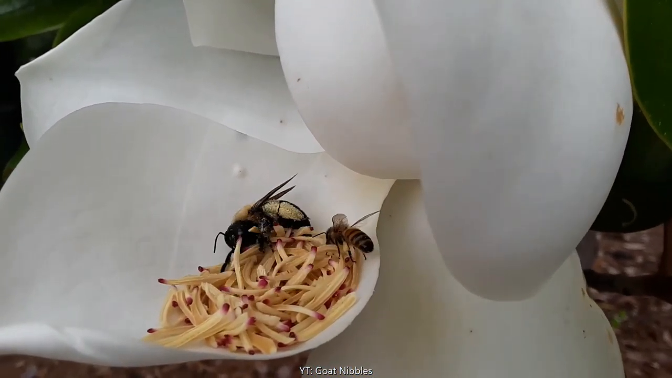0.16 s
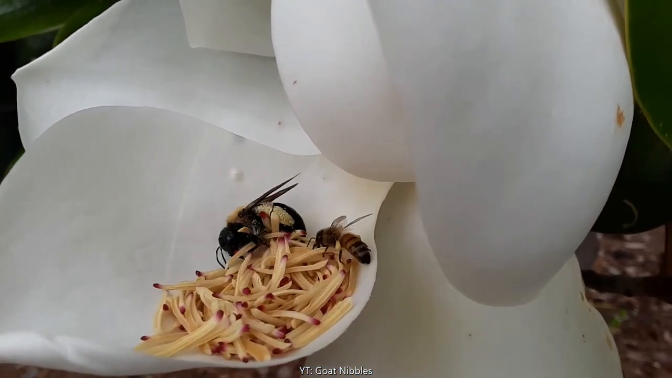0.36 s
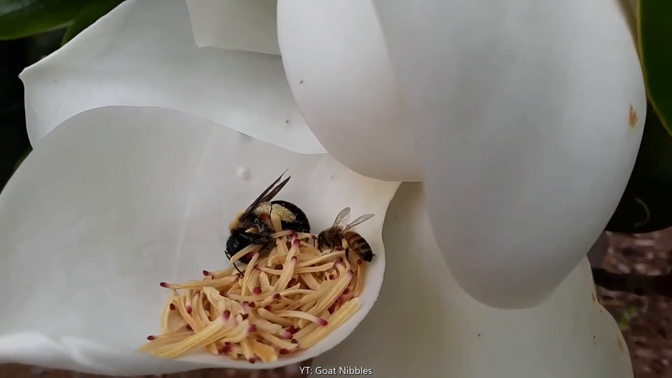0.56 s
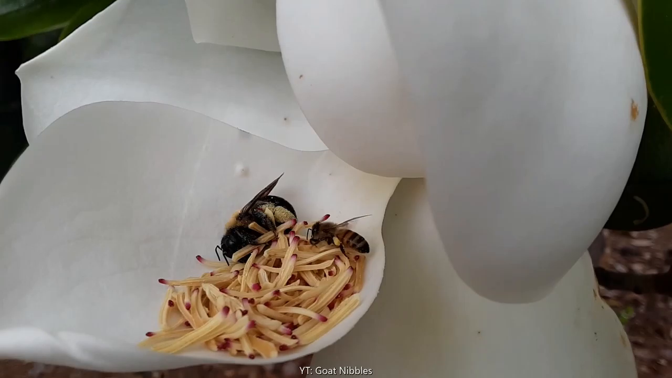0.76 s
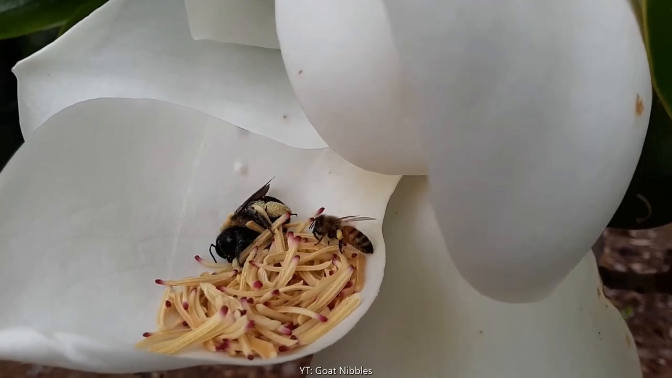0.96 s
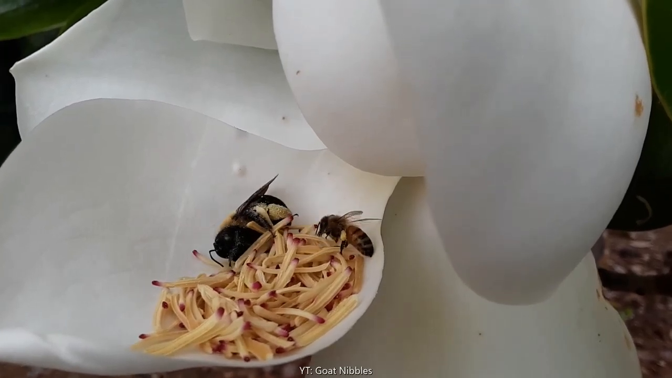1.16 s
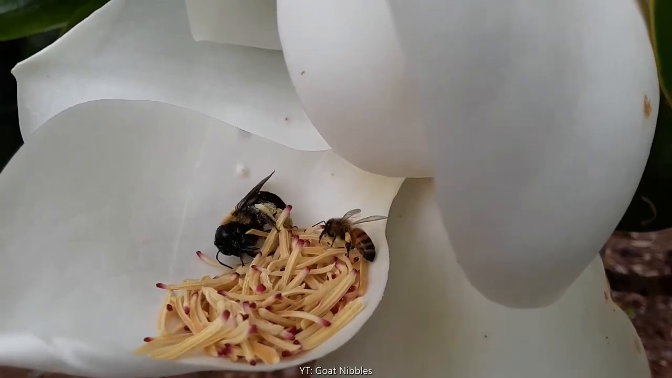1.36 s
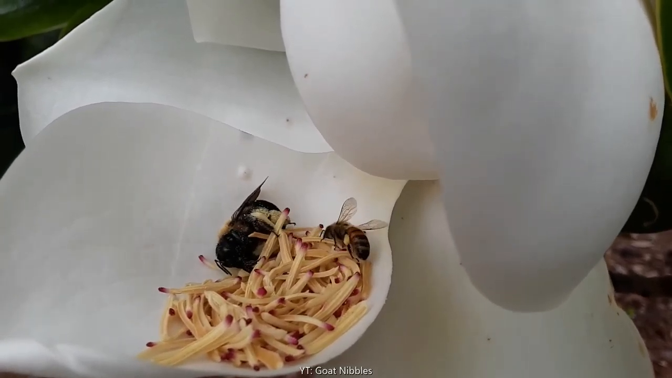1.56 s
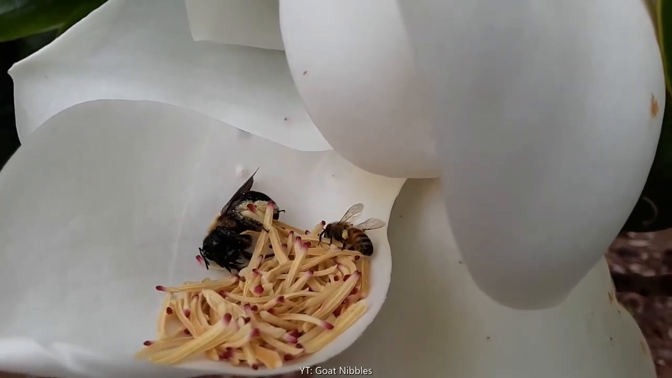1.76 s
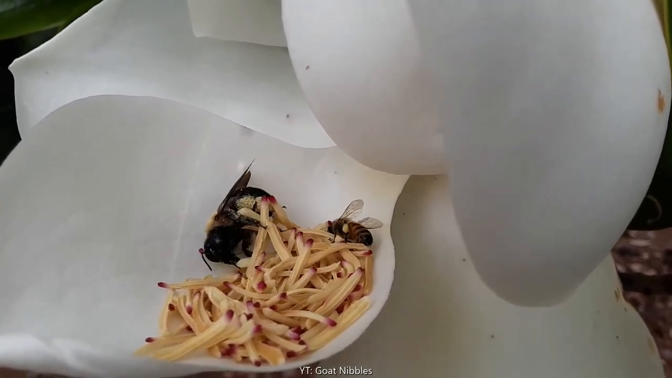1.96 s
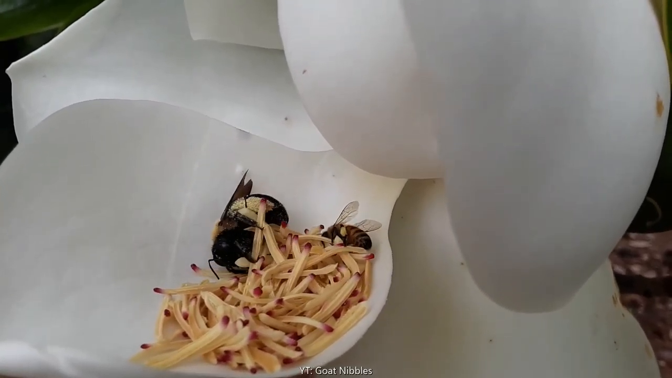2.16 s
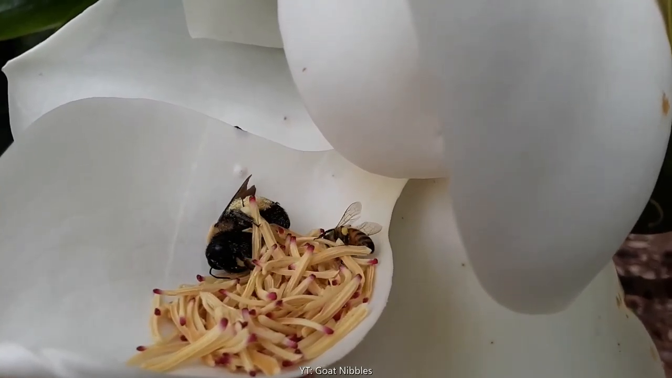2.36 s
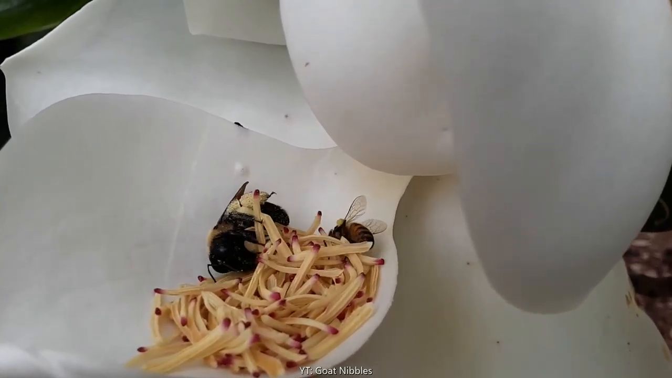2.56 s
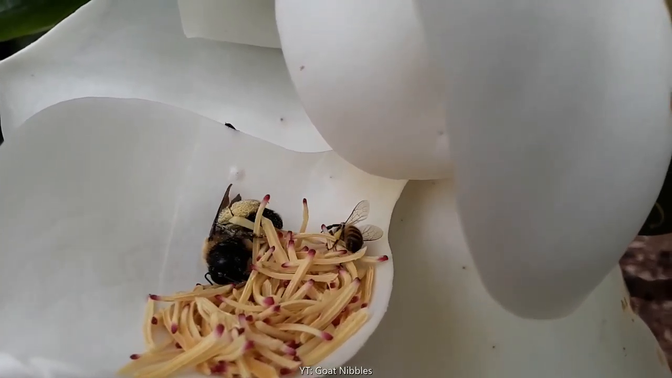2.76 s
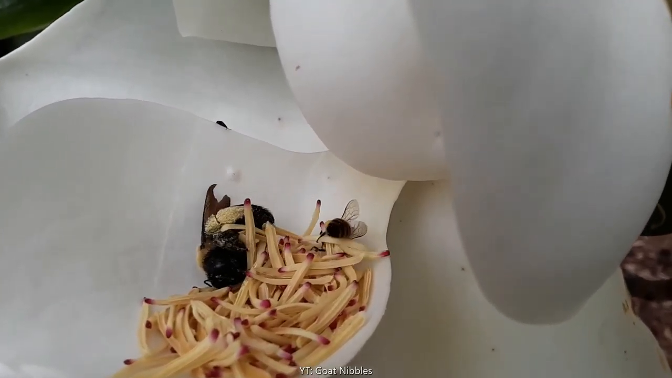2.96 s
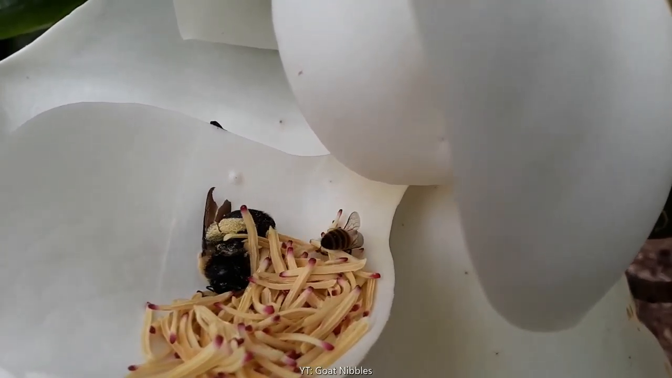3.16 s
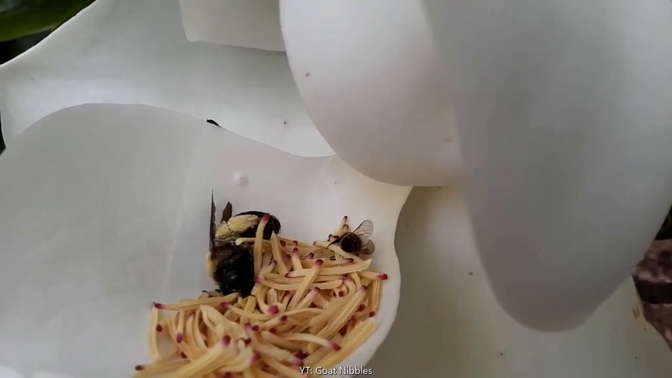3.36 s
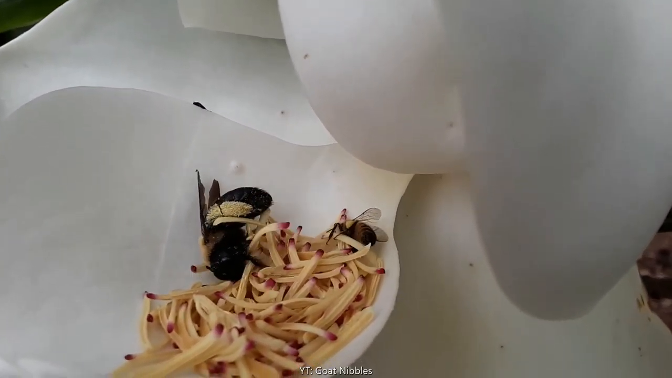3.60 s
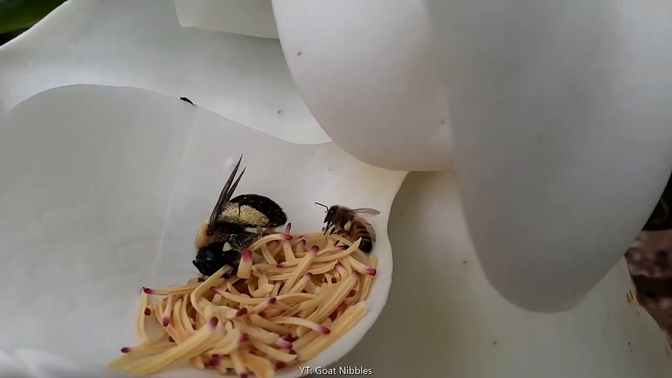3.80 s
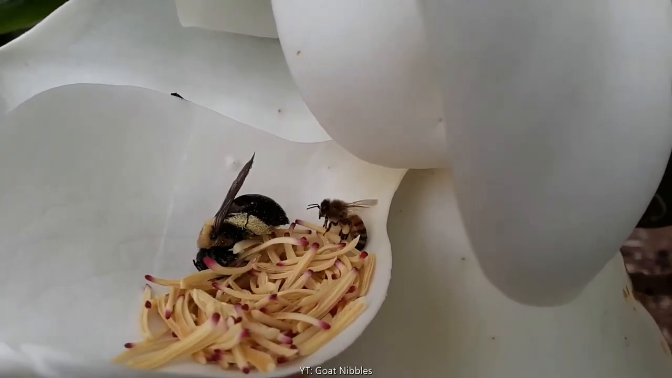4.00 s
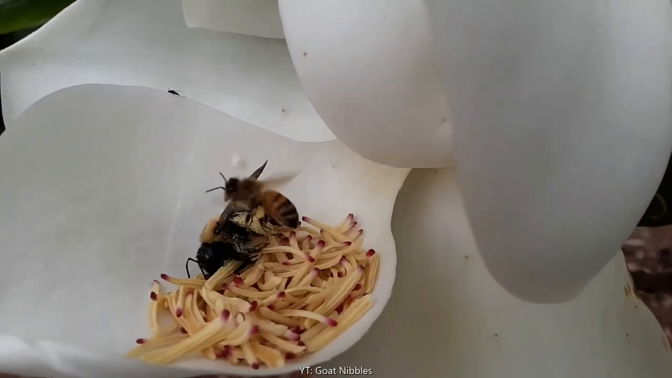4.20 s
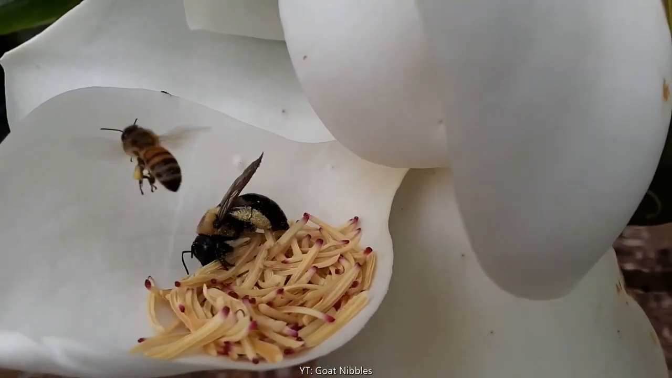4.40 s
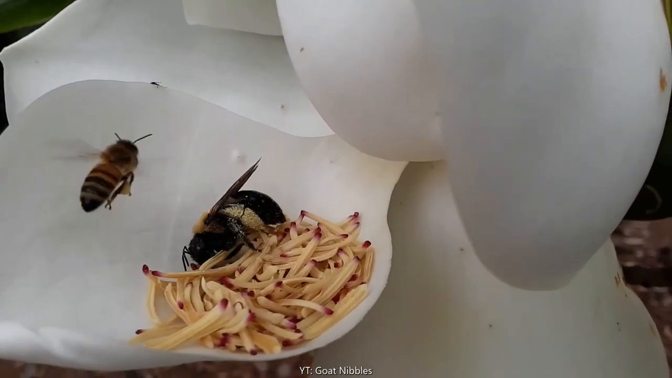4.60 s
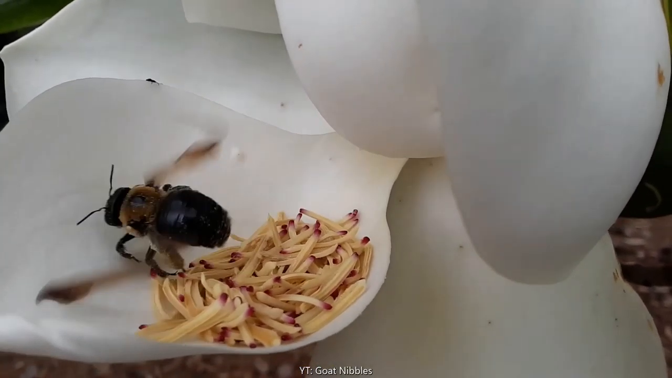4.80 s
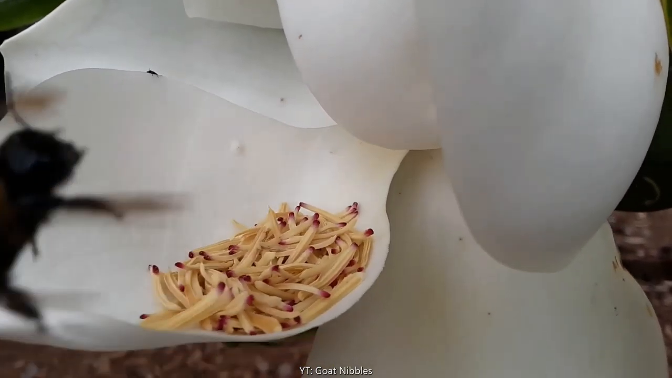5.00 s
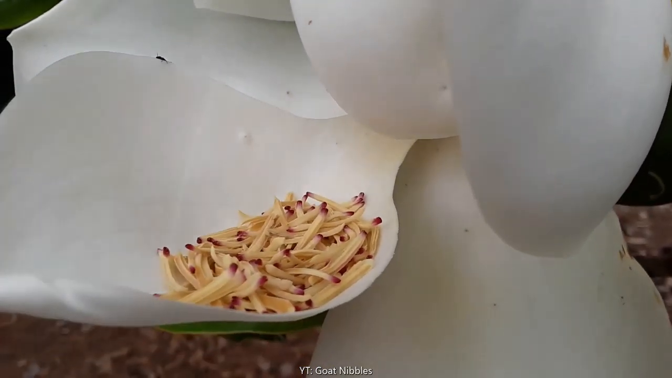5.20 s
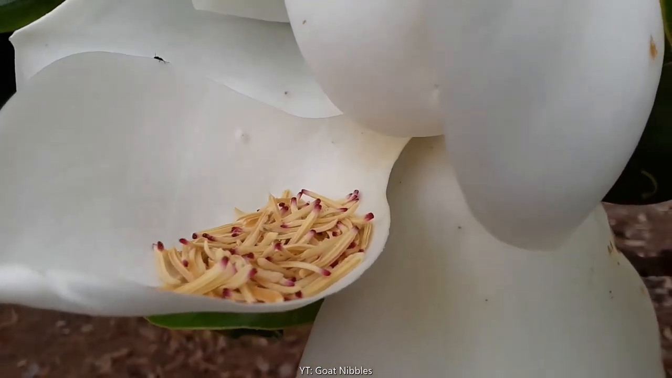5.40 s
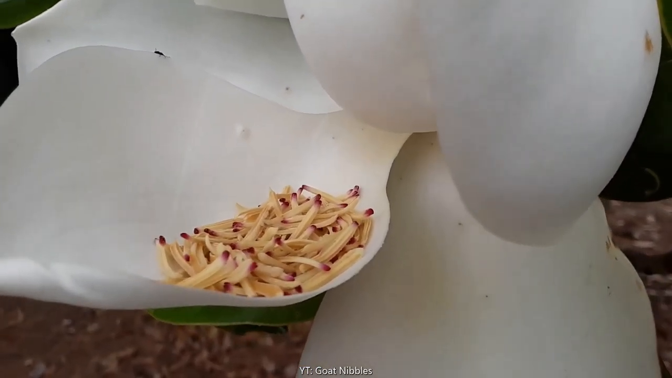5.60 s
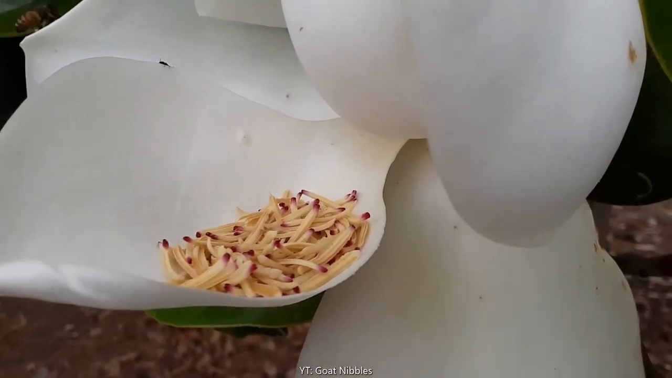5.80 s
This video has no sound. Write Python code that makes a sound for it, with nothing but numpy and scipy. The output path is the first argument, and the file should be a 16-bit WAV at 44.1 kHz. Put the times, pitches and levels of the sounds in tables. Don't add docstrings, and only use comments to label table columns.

```python
import sys
import numpy as np
from scipy import signal
from scipy.fft import rfft, irfft, next_fast_len
from scipy.io import wavfile
from scipy.ndimage import map_coordinates

SR = 44100
rng = np.random.default_rng(int(sys.argv[2]) if len(sys.argv) > 2 else 0)


def wav_out(sig):
    wavfile.write(sys.argv[1], SR, np.round(np.clip(np.atleast_2d(sig).T, -1, 1) * 32767).astype(np.int16))


def level_to_linear(level):
    exponent = np.asarray(level, float) / 20
    return 10 ** exponent


N = 257975

# t/s, f/Hz, level/dB
DIP = [(0, 5750, -20), (.012, 5950, -5), (.025, 6150, 4), (.036, 5100, -6), (.052, 4150, -12),
       (.072, 3080, -13), (.084, 4000, -17), (.094, 4950, -6), (.102, 5120, 0), (.122, 4930, -14)]
RISE = [(0, 3100, -22), (.05, 3250, -25), (.15, 4040, -8), (.2, 4440, -10.5), (.24, 5000, 2),
        (.28, 5444, 9.5), (.31, 5800, -38.5)]
WARBLE = [(0, 6900, -20), (.012, 6300, 1), (.03, 6600, 6), (.055, 6900, -3), (.11, 7200, -10),
          (.17, 7300, -8), (.19, 8400, -6)]
SLUR = [(0, 7150, -6), (.01, 6800, 6), (.025, 6200, 5), (.06, 6350, -2), (.11, 6300, -12)]
FALL = [(0, 4114, -11), (.02, 4320, -7), (.06, 3965, -2), (.095, 3400, -11.5), (.1, 3460, -42)]
UP = [(0, 4900, -12), (.008, 6000, 6), (.016, 6400, 2), (.022, 6450, -8)]
DOWN = [(0, 7050, -2), (.006, 6440, 5.5), (.018, 4900, -22)]
STEP = [(0, 4750, -6), (.012, 4850, 3), (.032, 4950, -3), (.042, 5450, 1), (.065, 5550, -4)]
LOW = [(0, 2444, -3), (.03, 2313, 3), (.09, 2050, -13), (.12, 2000, -12)]
HOOK = [(0, 2350, -14), (.03, 2900, -10), (.04, 2100, -22), (.06, 1990, -6), (.1, 2080, -1), (.13, 2220, 1),
        (.17, 2300, -7), (.24, 2250, -20)]
SEEP = [(0, 6900, 5), (.02, 7560, 2.9), (.06, 7680, 1.5), (.24, 7095, 0.5)]
FLICK = [(0, 6400, -6), (.018, 7720, 3.5), (.04, 8000, -14)]
CHIP = [(0, 5600, -28), (.005, 6300, -9), (.008, 6620, 0), (.012, 6660, -7), (.02, 6660, -18)]
FLAT = [(0, 978, 15), (.03, 1011, 2.1), (.1, 977, 8.1)]
DRONE = [(0, 1170, -6), (.18, 1150, 0), (.28, 1060, 2), (.42, 1165, -1), (.6, 1130, -4), (.9, 1150, -12),
         (1.1, 1135, -3), (1.4, 1140, -16), (1.65, 1120, -4), (1.9, 1150, -12)]
HOP = [(0, 4700, -8), (.008, 5100, 1), (.018, 5700, 3), (.04, 5450, -4), (.055, 5150, -8)]
HELD = [(0, 6650, -1), (.02, 6680, 0), (.04, 6650, -12), (.27, 6620, -22)]
PEEP = [(0, 4250, -8), (.012, 4300, 0), (.03, 4300, -8)]
GLIDE = [(0, 4000, -10), (.08, 4250, -1), (.14, 4600, 5), (.17, 4700, -3)]
MURMUR = [(0, 990, -4), (.15, 1005, 0), (.3, 995, -2), (.4, 1010, -6)]
TICK = [(0, 6800, -4), (.005, 6500, 0), (.012, 6050, -6)]


def unit(x):
    return x / np.sqrt(np.mean(x ** 2) + 1e-20)


def along(points, hz):
    f, v = np.transpose(points)
    return np.interp(np.log(hz + 1), np.log(f + 1), v)


def curves(rows, fade=0.013):
    s, *cols = np.transpose(rows)
    t = np.arange(N) / SR
    gate = np.clip(np.minimum(t - s[0], s[-1] - t) / fade + 1, 0, 1)
    return [gate] + [np.interp(t, s, c) for c in cols]


def ramp(start, length):
    return np.clip((np.arange(N) / SR - start) / length, 0, 1)


def wobble(rate, size=N):
    coarse = np.arange(0, size + 16, 16)
    knots = rng.standard_normal(int(size * rate / SR) + 4)
    return np.interp(np.arange(size), coarse, map_coordinates(knots, [coarse * rate / SR]))


def filtered(x, response):
    m = next_fast_len(N + 8192)
    return irfft(rfft(x, m) * response(np.fft.rfftfreq(m, 1 / SR)), m)[..., :N]


def noise(spectrum, channels=1):
    white = rng.standard_normal((channels, N))
    return unit(filtered(white, lambda hz: level_to_linear(along(spectrum, hz))))


def beside_left(pair, shade_db=0):
    # f/Hz, level/dB
    shadow = [(100, -2), (1500, -9), (6000, -9), (8000, -18), (11000, -37), (16000, -12)]
    off_petals = 0.033 * np.roll(pair[0], 18) + pair[1]
    far = filtered(off_petals, lambda hz: level_to_linear(along(shadow, hz)))
    return np.array([pair[0], far * level_to_linear(-shade_db)])


def hum(turns, orders, unsteady_db, ragged, overtones_db=0, upper_db=0):
    total = 0
    for k, db in orders:
        level_db = db + (k > 1) * overtones_db + (k > 4.5) * upper_db
        level_db = level_db + unsteady_db * np.log(k + .5) * wobble(20)
        fray = ragged * np.log(k + 0.17) * wobble(70)
        total = total + level_to_linear(level_db) * np.cos(2 * np.pi * (k * turns - 0.06854 * k * k) + fray)
    return total / np.sqrt(np.sum(level_to_linear(np.transpose(orders)[1]) ** 2) / 2)


def strokes(turns, share, life, scatter_db):
    puffs = level_to_linear(scatter_db * rng.standard_normal(int(turns.max()) + 2))
    size = puffs[np.clip(turns, 0, None).astype(int)]
    share = np.clip(share, 0, 1)
    return 1 - share + share * unit(size * np.exp(-(turns % 1) / life))


def wing(turns, spectrum, share, life, snap_db, scatter_db):
    snap = np.exp(-(turns % 1) / 0.0074) * level_to_linear(2.5 * wobble(60))
    snap = unit(filtered(snap, lambda hz: level_to_linear(along(spectrum, hz)) * np.exp(1.2j * np.sin(hz / 500))))
    puffs = strokes(turns, share, life, scatter_db) * noise(spectrum, channels=2)
    return unit(puffs + level_to_linear(snap_db) * snap)


def carpenter_bee():
    # t/s, closeness as hum level/dB
    closeness = [
        (4.83, -40.5),
        (4.93, -47.5),
        (4.955, -37.5),
        (5.055, -28),
        (5.092, -14),
        (5.185, -17),
        (5.25, -33.5),
        (5.39, -47.5),
        (5.85, -61),
    ]
    # t/s, f/Hz
    big_beat = [
        (4.83, 111.7),
        (4.94, 123.7),
        (5.05, 120.7),
        (5.29, 121.1),
        (5.39, 116.9),
        (5.46, 119.2),
        (5.66, 115.5),
        (5.85, 122.1),
    ]
    # multiple of the wingbeat, level/dB
    far_orders = [(1, -13), (2, 1), (3, -12.5), (4, -15), (5, -12.5), (6, -16.5), (7, -32), (8, -15),
                  (9, -12.5), (10, -33), (11, -22), (12, -50), (13, -42), (14, -23), (15, -24), (16, -20)]
    # multiple of the wingbeat, level/dB
    near_orders = [(1, -6), (2, -0.5), (3, -4), (4, -10.5), (5, -16), (6, -17.5), (7, -28.5), (8, -25.5)]
    # f/Hz, level/dB per Hz
    downwash = [(25, -25), (55, -23), (100, 1.5), (200, -4.5), (320, -2.5), (700, -18.5), (2000, -34),
                (4000, -74)]
    # t/s, level/dB, length/s
    gusts = [
        (5.099, 4, 0.016),
        (5.155, 6, 0.012),
        (5.183, 2, 0.0057),
    ]
    # f/Hz, level/dB per Hz
    big_wing = [(600, -18), (1050, -1.5), (1800, -9), (3300, -1.7), (6630, -2.5), (8470, -13.5),
                (13600, -6), (15800, -15)]
    clear_of_petal = 4.945

    gate, db = curves(closeness, fade=0.036)
    turns = np.cumsum(curves(big_beat)[1] * (1 + .004 * wobble(30))) / SR
    near = np.clip((db + 38.5) / 16, 0, 1)
    far_hum = hum(turns, far_orders, unsteady_db=.9, ragged=0.3 + 0.2 * np.clip((db + 55) / 12, 0, 1),
                  upper_db=-.4 * np.maximum(db + 56, 0))
    near_hum = hum(turns, near_orders, unsteady_db=0.0, ragged=0.36)
    tone = level_to_linear(db + 6.0) * ((1 - near) * far_hum + near * near_hum)

    t = np.arange(N) / SR
    gust_db = sum(peak_db * np.exp(-((t - s) / length) ** 2) for s, peak_db, length in gusts)
    push_off_db = 20 * (1 - ramp(clear_of_petal, 0.054))
    wash_db = gust_db + 3.5 + 1.34 * db + push_off_db
    puffs = strokes(turns, 0.15, 1.0, scatter_db=3)
    wash = level_to_linear(wash_db) * (0.36 + 0.85 * near) * puffs * noise(downwash)[0]

    glare_db = 4 * np.exp(-((t - 5.09) / 0.022) ** 2)
    rasp = wing(turns, big_wing, share=.5 - .25 * np.clip((db + 40) / 8, 0, 1), life=.13,
                snap_db=-1.5, scatter_db=2)
    rasp_db = -33.5 + 0.34 * db + glare_db
    hiss = ramp(clear_of_petal, 0.016) * level_to_linear(rasp_db) * rasp

    lead_db = 21 + .64 * np.maximum(db + 50, 0)
    body = tone * [np.ones(N), level_to_linear(-lead_db)] + wash * [[1], [0]]
    return gate * body + beside_left(hiss, shade_db=9.5 + 31 * near)


def honeybee():
    # t/s, wingbeat f/Hz, level of the second multiple/dB
    flight = [
        (4.1, 244, -76.5),
        (4.26, 252.2, -70),
        (4.272, 265.2, -59.5),
        (4.314, 265.8, -74),
        (4.408, 264, -67.5),
        (4.422, 254.7, -62.5),
        (4.664, 264.4, -62.5),
        (4.784, 229.8, -58),
        (4.79, 231.3, -77),
    ]
    # multiple of the wingbeat, level/dB
    honey_orders = [(1, 1.5), (2, -2.5), (3, -8), (4, -11.5), (5, -5.5), (6, -18), (7, -4.5), (8, -21),
                    (9, -23), (10, -28), (11, -18), (12, -18), (13, -21.5)]
    # f/Hz, level/dB per Hz
    small_wing = [(210, -37), (500, -10), (850, -23), (1600, -13), (4400, -9.5), (7810, -20.5),
                  (10700, -8.5), (15800, -15)]
    lift_s, lead_db = 4.092, 20.5

    gate, hz, db = curves(flight)
    turns = np.cumsum(hz * (1 + 0.0044 * wobble(30))) / SR
    hidden_db = -13 * (1 - ramp(4.335, 0.0093))
    upper_db = 7 * (1 - ramp(4.22, .06)) - 7 * ramp(4.23, .05) + 7 * ramp(4.4, .1)
    thin_hum = hum(turns, honey_orders, unsteady_db=2.0 - 1.9 * ramp(4.4, 0.089),
                   ragged=1.3 - 0.82 * ramp(4.38, .08), overtones_db=-1.5 - hidden_db, upper_db=upper_db)
    tone = gate * level_to_linear(db + 14 + hidden_db) * thin_hum

    hiss_db = -52.5 + 6 * np.exp(-np.abs(np.arange(N) / SR - lift_s - .03) / 0.031)
    hiss_gate = ramp(lift_s, 0.021) * (1 - ramp(4.69, 0.15))
    rasp = wing(turns, small_wing, share=0.46, life=0.56, snap_db=-6, scatter_db=3)
    return tone * level_to_linear([[0], [-lead_db]]) + beside_left(hiss_gate * level_to_linear(hiss_db) * rasp)


def petal():
    # t/s, level/dB, sharpness 0-1
    beating = [
        (4.669, -47, .3),
        (4.715, -43, 0.22),
        (4.76, -40, 0.38),
        (4.82, -39.5, .3),
        (4.855, -47, 0),
        (4.885, -45.5, .3),
        (4.91, -42.5, 0.1),
        (4.94, -43.5, 0.4),
        (5.02, -73, .5),
    ]
    # t/s, peak level/dB
    slaps = [(4.0881, -49.1), (4.0933, -44.9), (4.0979, -47.7), (4.1035, -48.5), (4.1107, -42.1),
             (4.1147, -35.8), (4.119, -36.6), (4.1235, -47.2), (4.1278, -39.1), (4.6708, -29.5),
             (4.6744, -34.0), (4.6797, -32.0), (4.6836, -29.5), (4.6895, -29.8), (4.6931, -30.6),
             (4.6978, -36.5), (4.7017, -26.4), (4.7095, -25.0), (4.7131, -31.9), (4.7183, -15.0),
             (4.7262, -28.1), (4.7347, -21.0), (4.7432, -25.5), (4.7513, -24.4), (4.7558, -36.9),
             (4.7595, -25.7), (4.7677, -22.9), (4.7756, -25.9), (4.784, -25.9), (4.7915, -24.1),
             (4.799, -23.7), (4.8063, -23.4), (4.8148, -28.2), (4.8227, -28.3), (4.83, -25.8),
             (4.8382, -33.8), (4.8649, -34.1), (4.8687, -22.2), (4.8752, -31.3), (4.8923, -32.2),
             (4.8999, -32.7), (4.9069, -34.7), (4.9155, -35.7), (4.9239, -32.9)]
    # f/Hz, level/dB per Hz
    petal_colour = [(250, -24), (500, -6.5), (2600, -10), (4500, -1.5), (5500, -7.5), (6600, -1),
                    (9000, -8.5), (11300, 0)]
    rise_s, t60_s = .0003, .01

    gate, db, sharp = curves(beating, fade=0.0035)
    turns = (np.arange(N) / SR - 4.6708) * 124.3
    swell = gate * level_to_linear(db + 9.5) * strokes(turns, sharp, 0.22, scatter_db=2.5)
    t = np.arange(900) / SR
    cracks = np.zeros(N)
    for s, peak_db in slaps:
        blow = level_to_linear(peak_db + 5.5 - 60 * t / t60_s) * (1 - np.exp(-t / rise_s))
        swell[round(s * SR):][:len(t)] += blow
        cracks[round((s + .0008) * SR)] = level_to_linear(peak_db + 12) * rng.choice([-1, 1])
    cracks = filtered(cracks, lambda hz: level_to_linear(along(petal_colour, hz)) * np.exp(1.5j * np.sin(hz / 600)))
    return beside_left(swell * noise(petal_colour, channels=2) + cracks * [[1], [0]])


def sing(note, hoarse, start, db, factor):
    s, hz, level = np.transpose(note)
    t = np.arange(int((s[-1] - s[0]) * SR)) / SR + s[0]
    flutter = 1 - hoarse + hoarse * wobble(460, size=len(t))
    quaver = 1 + 0.0716 * hoarse ** 4 * wobble(300, size=len(t))
    edge = np.clip(np.minimum(t - s[0], s[-1] - t) / 0.002, 0, 1)
    tone = np.sin(2 * np.pi * np.cumsum(factor * quaver * np.interp(t, s, hz)) / SR)
    place = round((start + s[0]) * SR) + SR
    return place, edge * flutter * level_to_linear(db + np.interp(t, s, level)) * tone


def birds():
    # [start t/s, level/dB, pitch factor]
    song = [
        (RISE, 0.063, -0.33, 2.2, [(2.33, -57, 1.)]),
        (DIP, 0.22, 4, 0.94, [(2.749, -45.5, 1.), (2.960, -44.5, 1.), (3.174, -43.5, 1.), (3.377, -45.5, .99)]),
        (FLICK, 0.58, -2.5, 1.5, [(2.715, -63, 1), (2.92, -53.5, 0.94), (3.135, -53.5, 0.95)]),
        (WARBLE, 0.9, -1.7, 1.1, [(3.342, -49, 1)]),
        (FALL, 0.38, -1.18, 2.1, [(3.565, -51.5, 0.95), (3.785, -52, 0.95)]),
        (UP, 0.065, -0.68, .1, [(3.679, -48, 1.), (3.895, -51, 1.)]),
        (DOWN, 0.069, 7, -5, [(3.706, -53.5, 0.97), (3.925, -60, 0.96)]),
        (STEP, 0.34, -2, 0.09, [(3.755, -53.5, 1)]),
        (SLUR, 0.6, 0, 3, [(3.527, -50, 1.), (3.834, -51, 1.), (4.086, -53, 1.)]),
        (HOP, 0.45, -2.7, 1, [(4.003, -52, 0.98)]),
    ]
    callers = [(HOOK, 0.5, -5, -8, [(.035, -57, 1.)]), (MURMUR, .5, -3, 1.1, [(0.001, -73, .45),
               (.001, -73, 1.21), (.001, -70, 1.73)]), (TICK, .2, 3, -2.5, [(1.912, -46, 1.)]),
               (GLIDE, .5, -4, 1.1, [(.385, -65, 1.)]), (DRONE, 0.4, -2, 1.1, [(0.001, -72, 0.99)]),
               (CHIP, .1, 6.5, -2.5, [(1.966, -42, .99), (1.993, -42.5, 1.), (2.0, -41.5, 1.),
               (2.062, -48, 1.), (2.095, -53, 1.)]), (HELD, .35, -1.5, -2.5, [(2.012, -40, 1.)]),
               (PEEP, .3, -3, .1, [(1.922, -59, 1.), (2.185, -60, 1.27)]),
               (LOW, 0.47, -10, -3.5, [(3.86, -63.5, 0.95), (3.99, -61, 1.)]),
               (SEEP, 0.38, -1.3, 1.1, [(4.34, -50.5, 0.98)]), (FLAT, 0.57, -11, 2.5, [(1.8, -63.5, 6.3),
               (1.8, -66, 7.64), (2.43, -66, 6.05)])]
    # t/s, f/Hz, level/dB
    trill_note = [(0, 4500, -18), (.012, 5400, -10), (.028, 5800, -11), (.034, 6400, -30), (.044, 6700, 5),
                  (.056, 6950, 0), (.064, 7600, -12)]
    # start t/s, spacing/s, level/dB, pitch factor
    trill_runs = [
        (-.054, .0775, -53.5, .98),
        (.49, .078, -57, .97),
        (.46, .078, -63, .76),
    ]
    trill_counts = [10, 1, 2]
    # f/Hz, t60/s
    trees = [(1000, 0.3), (5000, 0.27), (9000, 0.17)]
    # delay t/s, level/dB
    echoes = [(0.016, -8)]

    trills = []
    for (start, gap, db, factor), count in zip(trill_runs, trill_counts):
        for k in range(count):
            trills.append((start + k * gap, db + rng.normal(0, 0.97), factor))
    straight, into_trees = np.zeros((2, N + 2 * SR)), np.zeros((2, N + 2 * SR))
    for note, hoarse, direct_db, lead_db, plays in song + callers + [(trill_note, .4, 1, 0, trills)]:
        for start, db, factor in plays:
            at, x = sing(note, np.clip(hoarse, 0, 1), start, db, factor)
            end = at + len(x)
            x = x * level_to_linear([[lead_db / 2], [-lead_db / 2]])
            straight[0, at:end] += level_to_linear(direct_db) * x[0]
            straight[1, at + 9:end + 9] += level_to_linear(direct_db) * x[1]
            into_trees[:, at:end] += x

    hz, t, z = signal.stft(rng.standard_normal((2, SR // 2)), SR, nperseg=256)
    tail = signal.istft(z * level_to_linear(-60 * t / along(trees, hz)[:, None]), SR, nperseg=256)[1]
    tail = tail / np.linalg.norm(tail[0])
    late = level_to_linear(-2.0) * signal.fftconvolve(into_trees, tail, axes=1)[:, :N + 2 * SR]
    early = 0
    for s, db in echoes:
        left, right = np.roll(straight[0], round(s * SR)), np.roll(straight[1], round(s * 1.3 * SR))
        early = early + level_to_linear(db) * np.array([left, right])
    return (straight + early + late)[:, SR:SR + N]


def leaves():
    # t/s, peak level/dB
    rustle = [
        (0.02, -68),
        (.51, -71.5),
        (1.025, -76.5),
        (1.29, -79),
        (1.761, -77),
        (1.912, -77),
        (1.972, -82),
        (2.99, -79),
        (3.568, -73),
        (3.63, -64),
    ]
    s, db = np.transpose(rustle)[:, :, None]
    age = np.arange(N) / SR - s
    stir = level_to_linear(db) * np.exp(-np.maximum(-age / 0.026, age / 0.034))
    swell = level_to_linear(-86) + np.sum(stir, axis=0)
    dry_leaf = noise([(1000, -25), (3000, -8), (9000, -4), (12000, -3), (16000, -9)])[0]
    return swell * level_to_linear(4 + 2.5 * wobble(65)) * dry_leaf * [[1], [.15]]


def garden():
    # t/s, level/dB
    traffic = [
        (0.0, -68.5),
        (0.21, -64),
        (0.5, -67.5),
        (1.55, -71),
        (2.0, -67.5),
        (3.1, -72),
        (3.83, -65.5),
        (4.8, -59.5),
        (5.85, -74.5),
    ]
    # f/Hz, level/dB per Hz
    rumble_colour = [(15, -80), (25, -30), (85, -10.5), (123, -1), (356, -23), (500, -24), (650, -66),
                     (1100, -120)]
    # f/Hz, level/dB per Hz
    air_colour = [(200, -8.5), (350, -6), (700, -9.5), (3000, -8.5), (6800, -17), (7400, -17.5),
                  (10000, -14.5), (16000, -13)]
    # t/s, level/dB
    far_birds = [
        (0, -68.5),
        (.6, -61.5),
        (1.05, -72),
        (1.6, -75),
        (2.05, -66.5),
        (2.4, -75),
        (3.6, -64),
        (4.6, -60.5),
        (5.85, -68.5),
    ]
    # f/Hz, level/dB per Hz
    shimmer = [(3000, -37), (3900, -5.5), (5700, 0), (6800, 0), (7500, -14), (8300, -30), (9000, -60)]
    # f/Hz, likeness 0-1
    alike = [(60, 0.96), (200, 0.66), (600, 0.26), (1500, 0.025), (4000, 0)]

    rumble = level_to_linear(curves(traffic)[1] + 0.5 + 1.2 * wobble(7.1)) * noise(rumble_colour, channels=2)
    air = level_to_linear(-70.5 + .6 * wobble(2.08)) * noise(air_colour, channels=2)
    chorus = level_to_linear(curves(far_birds)[1] + 0.96 * wobble(17)) * noise(shimmer, channels=2)

    def mid_side(hz):
        angle = np.arccos(np.clip(along(alike, hz), -1, 1)) / 2
        return np.array([np.cos(angle), np.sin(angle)])

    mid, side = filtered(rumble + air + chorus, mid_side)
    return np.array([mid + side, mid - side]) * level_to_linear([[.8], [-.8]])


def scene():
    return carpenter_bee() + honeybee() + petal() + birds() + leaves() + garden()


def top_cut(x):
    return signal.sosfilt(signal.butter(12, 15900, fs=SR, output="sos"), x)


def record(dry):
    held = dry / (1 + np.abs(dry / .99) ** 6) ** (1 / 6)
    held = filtered(held, lambda hz: hz < 15920)
    return top_cut(held)


dry = scene()
out = record(dry)
wav_out(out)
```